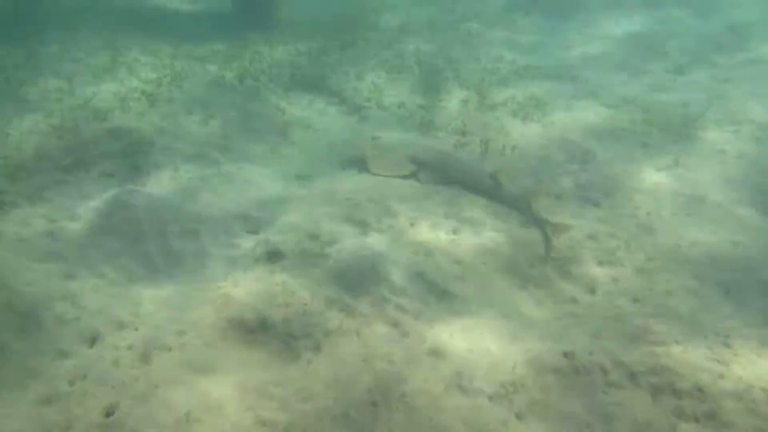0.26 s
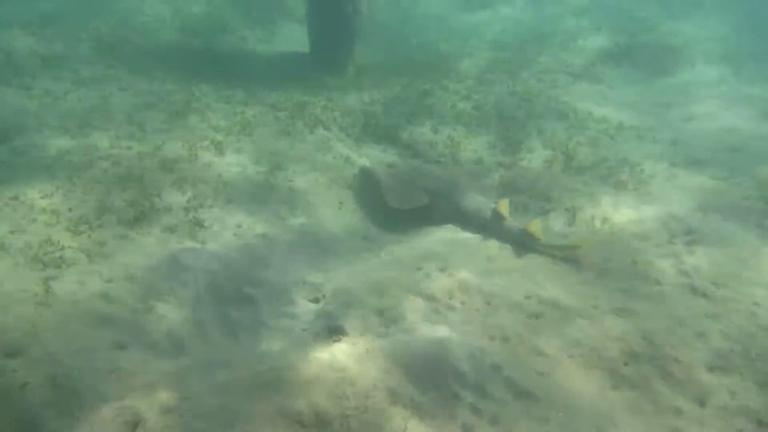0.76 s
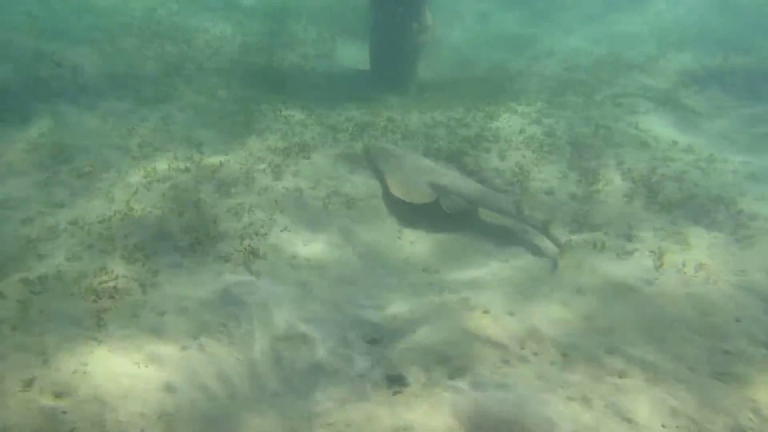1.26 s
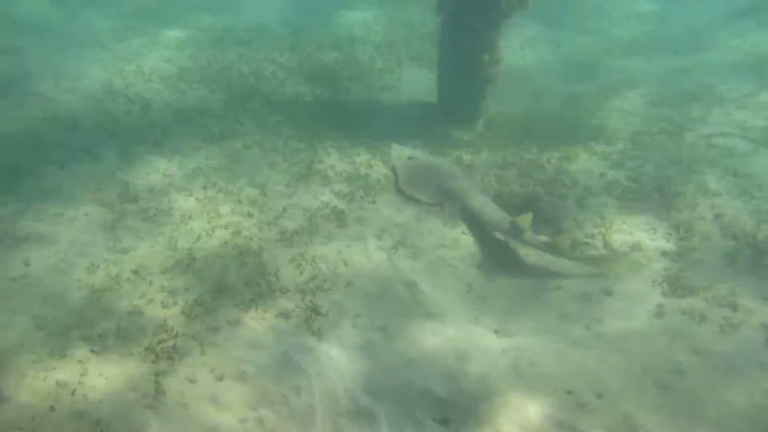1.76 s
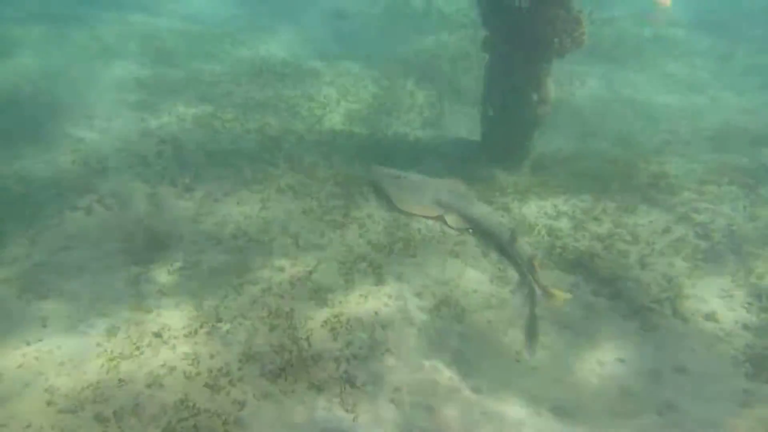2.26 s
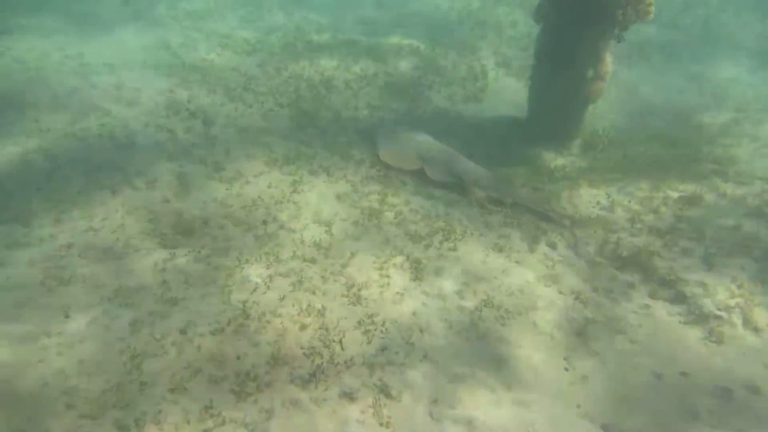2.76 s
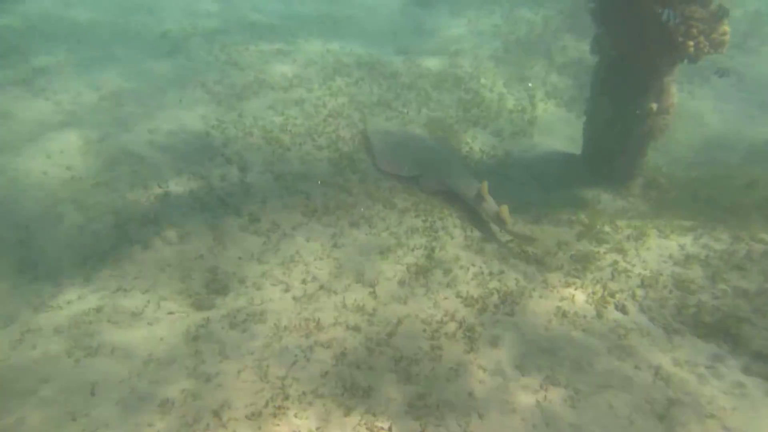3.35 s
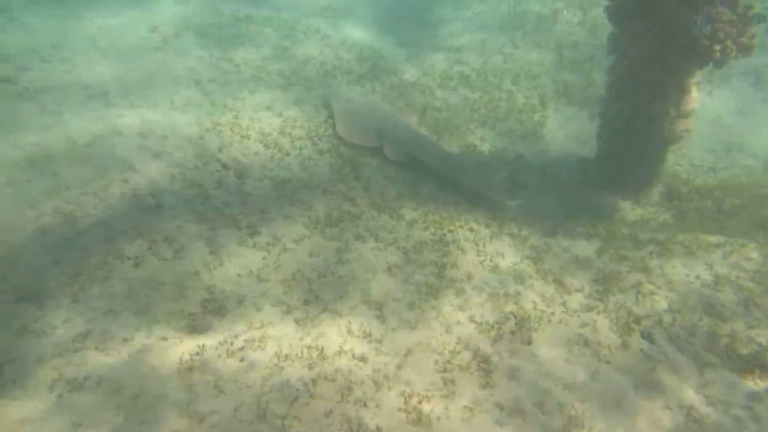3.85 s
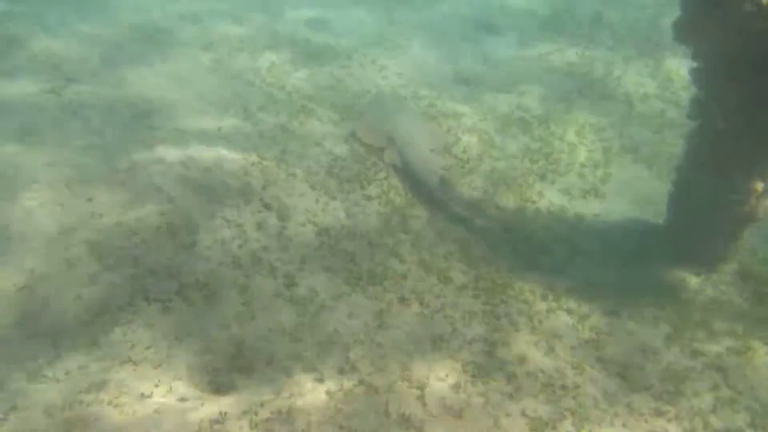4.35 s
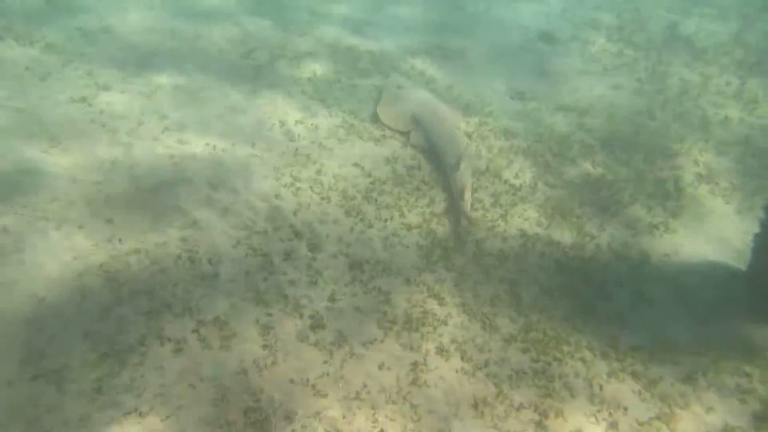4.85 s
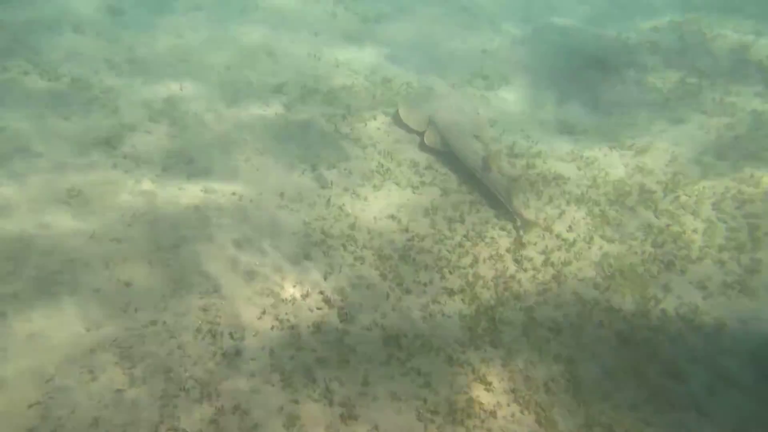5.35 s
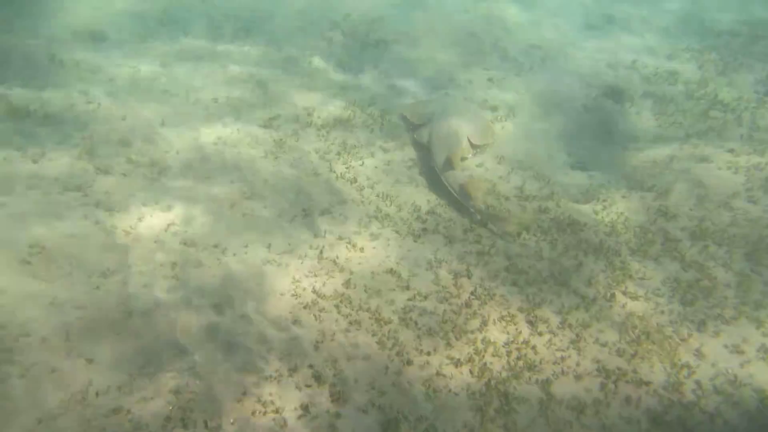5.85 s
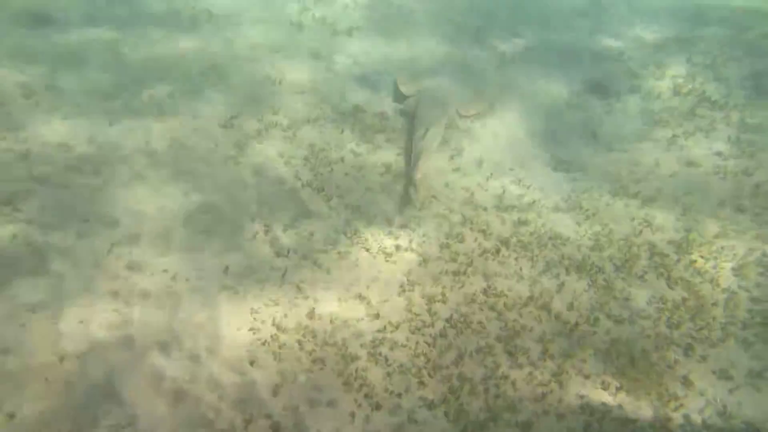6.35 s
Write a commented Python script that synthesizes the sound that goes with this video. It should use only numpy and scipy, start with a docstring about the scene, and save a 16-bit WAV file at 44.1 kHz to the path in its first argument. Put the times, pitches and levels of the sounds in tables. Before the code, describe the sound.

Muffled underwater rumble and a dull, wavering hum, with hollow knocks of water on the microphone's case, small gurgles and faint clicks.

```python
"""Shallow sea water, heard from inside a camera's waterproof case carried along over the sand.
Turbulence rumbles, fizzes and sloshes, and drives the case into a resonant hum near 460 Hz.
Shrimp snap, electronics whine faintly, the camera's mechanism ticks, bubbles glug and bumps thud.
Loudest are the knocks of water on the case, each a damped resonance. The hardest overload
the recorder, whose gain control ducks and slowly recovers."""
import sys
import numpy as np
from scipy import signal
from scipy.fft import rfft, irfft, next_fast_len
from scipy.io import wavfile
from scipy.ndimage import map_coordinates

SR = 44100
rng = np.random.default_rng(int(sys.argv[2]) if len(sys.argv) > 2 else 0)


def to_wav(sig):
    """Store sig (one row per channel, or 1-D mono) as 16-bit WAV at the path in sys.argv[1].

    Samples outside -1..1 are clipped; the rate is SR.
    """
    pcm = np.clip(np.atleast_2d(sig), -1, 1) * 32767
    pcm = np.round(pcm).astype(np.int16)
    wavfile.write(sys.argv[1], SR, pcm.T)  # frames by channels


N = 291501
TIME = np.arange(N) / SR


def amp(db):
    """Amplitude ratio of a level in decibels."""
    return 10 ** (np.asarray(db) / 20)


def add(track, start_s, sound):
    """Superposition: a sound sums into the track."""
    part = track[max(0, round(start_s * SR)):][:len(sound)]
    part += sound[:len(part)]


def curve(rows):
    """Linear interpolation of (time [s], value) points."""
    return np.interp(TIME, *np.transpose(rows))


def wobble(rate):
    """Random modulation: a spline through rate points a second."""
    return map_coordinates(rng.standard_normal(int(N * rate / SR) + 4), [TIME * rate])


def filtered(x, response):
    """Linear filtering: the spectrum times a frequency response."""
    size = next_fast_len(x.shape[-1] + 8192)
    spectrum = rfft(x, size) * response(np.fft.rfftfreq(size, 1 / SR))
    return irfft(spectrum, size)[..., :x.shape[-1]]


def coloured(x, spectrum):
    """Spectral shaping by (frequency [Hz], level [dB]) points, at rms 1."""
    freqs, db = np.transpose(spectrum)
    shaped = filtered(x, lambda hz: amp(np.interp(np.log(hz + 1), np.log(freqs), db)))
    return shaped / np.sqrt(np.mean(shaped ** 2) + 1e-20)


def churn(spectrum, lumps_db, rate):
    """Intermittency: noise arrives in lumps, rate a second, and the case colours it."""
    return coloured(rng.standard_normal(N) * amp(lumps_db * wobble(rate)), spectrum)


def rings(rows, octaves_per_s=0):
    """Damped resonance: each row is a tone that swells over its rise time and dies away."""
    out = np.zeros(N)
    for start, db, hz, rise in rows:
        t = np.arange(int(10 * rise * SR)) / SR
        phase = 2 * np.pi * np.cumsum(hz * 2 ** (octaves_per_s * t)) / SR
        envelope = (t / rise * np.exp(1 - t / rise)) ** 2
        add(out, start, amp(db) * envelope * np.sin(phase))
    return out


# spells of whine: (start [s], end [s], level [dB])
WHINE_SPELLS = [(0, .07, -83), (.6, 3.15, -79.5), (3.145, 4.158, -76.5), (4.647, 5.992, -86)]


def whine():
    """Amplitude modulation: the camera's electronics give a faint, wavering pure tone."""
    level = sum(amp(db) * ((TIME >= start) & (TIME < end)) for start, end, db in WHINE_SPELLS)
    return level * amp(.9 * wobble(7)) * np.sin(2 * np.pi * 12408 * TIME)


# spectrum of a snap: (frequency [Hz], level [dB])
SNAP_SPECTRUM = [(1500, -25), (4000, -15.5), (6000, -9.5), (7700, -1), (9500, -7.5), (15000, -17.5)]
# near snaps, probably shrimp: (time [s], level [dB])
NEAR_SNAPS = [(0.0702, -50.5), (2.3926, -66.5), (2.454, -59.5), (2.7536, -54), (2.7639, -53),
              (3.926, -50.5), (4.6862, -50)]


def shrimp(t60_s=0.042):
    """Broadband impulses: near snaps stand out, while many far ones merge into a crackle."""
    near, t = np.zeros(N), np.arange(SR // 50) / SR
    for start, db in NEAR_SNAPS:
        snap = coloured(rng.standard_normal(len(t)) * amp(-60 * t / t60_s), SNAP_SPECTRUM)
        add(near, start, amp(db) * snap / np.abs(snap).max())
    far = amp(-86.5) * churn(SNAP_SPECTRUM, lumps_db=2.5, rate=220)
    return near + far


# spectra of fizz and rumble: (frequency [Hz], level [dB])
FIZZ_SPECTRUM = [(500, -19), (950, 7), (1150, 8.5), (1600, 1.5), (1800, -15), (2100, -16.5), (3500, -32),
                 (6000, -35.5), (15000, -33.5)]
RUMBLE_SPECTRUM = [(8, -1), (22, 2.5), (50, -0.5), (90, -11), (160, -21), (500, -73)]
# their envelopes: (time [s], level [dB])
FIZZ_ENVELOPE = [(0.0, -58.5), (0.6, -56), (1.0, -60.5), (3.9, -56), (5.4, -66), (5.6, -63), (6.6, -63)]
RUMBLE_ENVELOPE = [(0.0, -29.5), (1.4, -41.5), (1.6, -32), (1.7, -38.5), (2.3, -32.5), (2.7, -39.5),
                   (3.9, -35.5), (5.1, -39.5), (6.6, -38)]


def turbulence():
    """Turbulent pressure fluctuations make a deep rumble and a dull fizz."""
    rumble = amp(curve(RUMBLE_ENVELOPE)) * churn(RUMBLE_SPECTRUM, lumps_db=-1.0, rate=10)
    fizz = amp(curve(FIZZ_ENVELOPE)) * churn(FIZZ_SPECTRUM, lumps_db=2.1, rate=49)
    return rumble + fizz


def slaps(count=26, rise_s=.006):
    """Random excitation: small slaps of water ring the case near its resonance."""
    times = (np.arange(count) + rng.random(count)) * TIME[-1] / count
    size, detune = rng.standard_normal((count, 2)).T
    over_hum_db = 4 + 1.5 * size
    pitches_hz = 452 * np.exp(.07 * detune)
    return rings((*row, rise_s) for row in zip(times, over_hum_db, pitches_hz))


# water speed relative to its usual value: (time [s], level [dB])
FLOW_SPEED = [(0.0, 3.9), (0.5, 1.2), (0.6, 6), (0.8, -4), (1.3, 2.7), (1.4, -1.5), (2.5, 8.5), (2.7, 0.5),
              (3.6, 0), (3.7, -2), (4.3, 4), (4.5, -0.8), (4.7, 8.5), (5.1, -1.5), (5.4, -8), (5.6, -7),
              (6.1, -7.5), (6.6, 2)]
# spectra of slosh and case resonance: (frequency [Hz], level [dB])
SLOSH_SPECTRUM = [(40, -22.5), (100, -7.5), (165, -4), (235, -4.5), (290, 4), (370, -0.5), (600, -36.5),
                  (1200, -71.5)]
CASE_SPECTRUM = [(250, -35.5), (350, -14.5), (400, -9), (435, 3.5), (462, 2.5), (505, 0), (550, -10.5),
                 (600, -15.5), (655, -12), (760, -29.5), (850, -38.5), (970, -33.5), (1150, -51),
                 (2000, -90)]


def flow_noise():
    """Forced vibration: the case's hum grows as a power of flow speed, the slosh more steeply."""
    flow_db = curve(FLOW_SPEED)
    resonance = churn(CASE_SPECTRUM, lumps_db=1.5, rate=60) + slaps()
    hum = amp(-21.5 + 0.74 * flow_db) * resonance
    slosh = amp(-42 + 1.8 * flow_db) * churn(SLOSH_SPECTRUM, lumps_db=3.0, rate=35)
    return hum + slosh


# modes that a tick excites: (frequency [Hz], level [dB], 60 dB decay time [s])
TICK_MODES = [(1382, 2, 0.012), (1575, 6.5, 0.018), (1980, -14.5, 0.019), (2780, -12, 0.015)]
# ticks of the camera's mechanism switching on and off: (time [s], level [dB])
MECHANISM_TICKS = [(0.0703, -21), (.601, -21), (2.8639, -29), (3.145, -29), (4.158, -39), (4.6458, -41),
                   (5.991, -40)]


def ticks(spread_db=2, rise_s=0.00024):
    """Free vibration: the camera's mechanism ticks, exciting modes at slightly varying strengths."""
    out, t = np.zeros(N), np.arange(SR // 20) / SR
    hz, mode_db, t60 = np.transpose(TICK_MODES)[:, :, None]
    onset = (1 - np.exp(-t / rise_s)) ** 2
    for start, db in MECHANISM_TICKS:
        envelopes = amp(mode_db + spread_db * rng.standard_normal(hz.shape) - 60 * t / t60)
        tick = onset * np.sum(envelopes * np.sin(2 * np.pi * hz * t), axis=0)
        add(out, start, amp(db) * tick / np.abs(tick).max())
    return out


# the large bubble ending each run of small ones: (time [s], level [dB], frequency [Hz], run length [s])
GURGLES = [(1.272, -20.5, 312, .15), (2.237, -18.5, 299, 0.095), (2.462, -20, 300, 0.13),
           (3.247, -21.5, 358, 0.092), (4.279, -18, 293, .2), (4.899, -19.5, 325, 0.36),
           (6.544, -16, 302, 0.16)]


def bubbles(gap_s=.04, rise_s=0.011, small_db=-27.5, run_octaves_per_s=1.5):
    """Bubble resonance: each sounds higher than the last and glides up as it nears the surface."""
    rows = []
    for end, db, hz, run_s in GURGLES:
        jitter, sizes = rng.standard_normal((2, 10))
        leads_s = gap_s * (np.arange(1, 11) + .2 * jitter)
        rows.append((end, db, hz, rise_s))
        for lead, size in zip(leads_s, sizes):
            if lead < run_s:
                small_hz = hz * 2 ** (-run_octaves_per_s * lead)
                rows.append((end - lead, small_db + 3 * size, small_hz, rise_s))
    return rings(rows, octaves_per_s=0.97)


# soft bumps: (time [s], level [dB], frequency [Hz])
CASE_BUMPS = [(0.364, -18.5, 79.5), (0.579, -8, 117.8), (1.563, -17, 65.3), (1.604, -18, 45),
              (2.259, -12, 105), (2.421, -22.5, 55), (2.86, -19.5, 98.5), (2.953, -25, 90),
              (3.962, -21, 80), (4.936, -16.5, 75), (5.206, -22.5, 85)]


def thuds(rise_s=.0041):
    """Heavy damping: a bump pushes the whole case, and the water cushions it to a thud."""
    return rings((*row, rise_s) for row in CASE_BUMPS)


# blows of water on the case: (time [s], level [dB], frequency [Hz], rise time [s])
WATER_KNOCKS = [(0.58, -1, 440, 0.0035), (0.589, 10.5, 475, 0.0041), (0.649, -13.5, 330, 0.0016),
                (0.708, 6, 473, .0046), (1.31, -3.5, 471, 0.0078), (1.812, -8.5, 428.5, .012),
                (2.141, -8.5, 427.4, .0068), (2.261, 3.5, 303, .0017), (2.391, -4, 426, .0037),
                (2.56, -13.5, 577, .0025), (2.591, -5, 467, 0.008), (2.861, -7, 450.4, .0033),
                (3.217, -8.5, 430, 0.006), (3.6, 0.5, 462, .0035), (3.923, -5, 469, .0058),
                (4.241, 0, 469.4, .004), (4.36, 6, 468, .0041), (4.718, 6, 462.5, 0.0051),
                (4.81, -10.5, 470, 0.011), (4.906, -10, 422, 0.0097), (4.934, -5.5, 484, 0.0042),
                (4.958, -3.5, 464, .0046), (5.06, -8.5, 455, 0.0058), (5.24, -2, 490.5, 0.0026),
                (5.32, -4, 462, 0.0049), (5.519, 8, 463.3, .0048)]


def knocks():
    """Impact excitation: each blow rings the case, and the water damps it to a dull knock."""
    return rings(WATER_KNOCKS)


def scene():
    """Superposition: all sources sum at the microphone inside the case."""
    water = flow_noise() + turbulence()
    return (water + whine() + shrimp() + ticks() + bubbles() + thuds() + knocks())[None]


def gain_control(x, limit_db, release_db_per_s, attack_s):
    """Dynamic compression: peaks over the limit pull the gain down fast; it recovers slowly."""
    excess_db = np.maximum(20 * np.log10(np.abs(x) + 1e-9) - limit_db, 0)
    recovery_db = release_db_per_s * TIME
    held_db = np.maximum.accumulate(excess_db + recovery_db, axis=-1) - recovery_db
    pole = np.exp(-1 / (attack_s * SR))
    return x * amp(-signal.lfilter([1 - pole], [1, -pole], held_db))


def overload(x, knee, squash):
    """Symmetric distortion: squashing above the knee and clipping at full scale add odd harmonics."""
    excess = x - np.clip(x, -knee, knee)
    return np.clip(x - squash * excess, -1, 1)


def record(dry):
    """Limited dynamic range and bandwidth: gain control, overload, then a low-pass cutoff."""
    ducked = gain_control(dry, limit_db=-1.05, release_db_per_s=15.5, attack_s=.00036)
    distorted = overload(ducked, knee=.52, squash=0.091)
    return filtered(distorted, lambda hz: hz < 15850)


dry = scene()
out = record(dry)
to_wav(out)
```